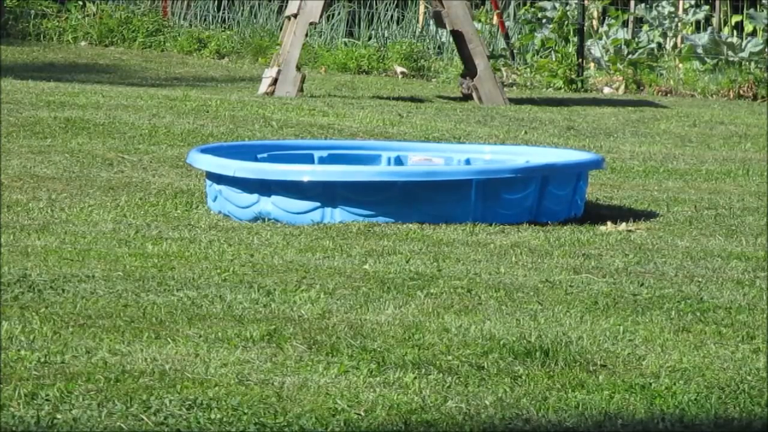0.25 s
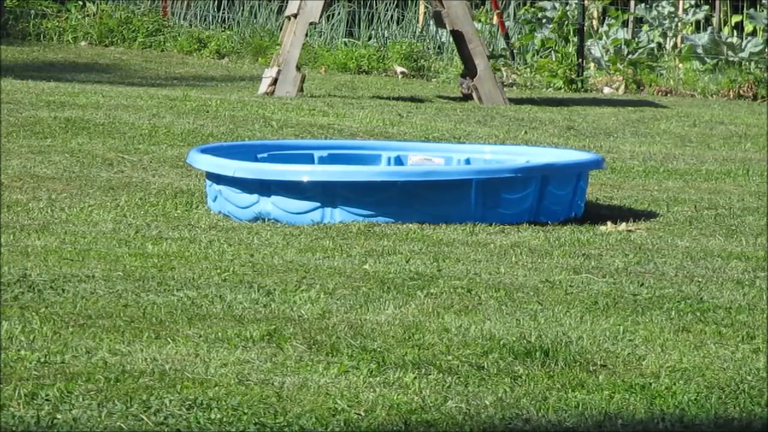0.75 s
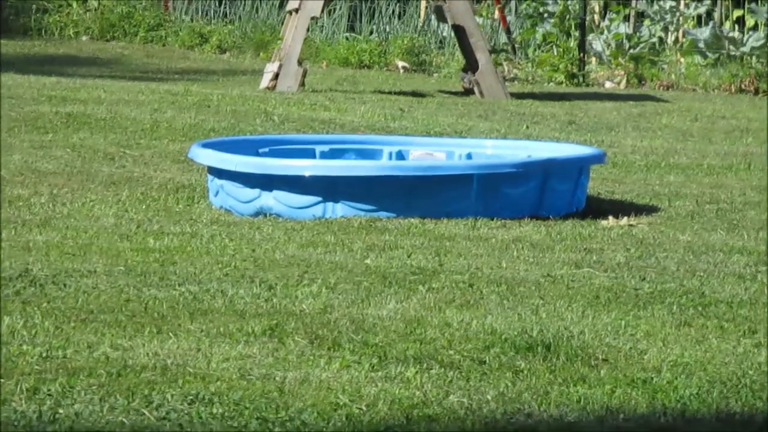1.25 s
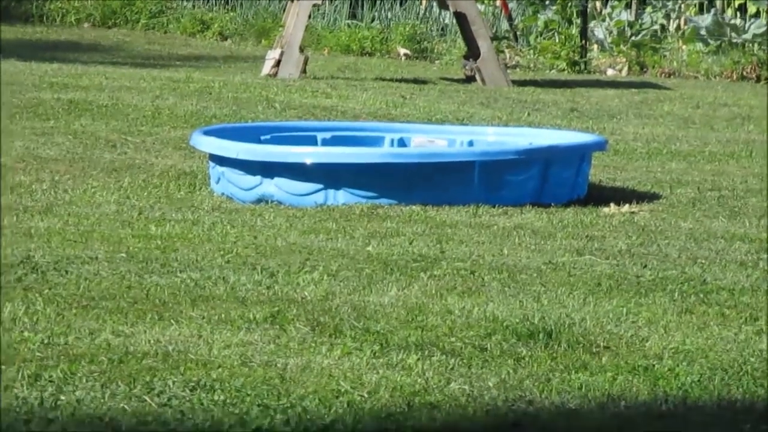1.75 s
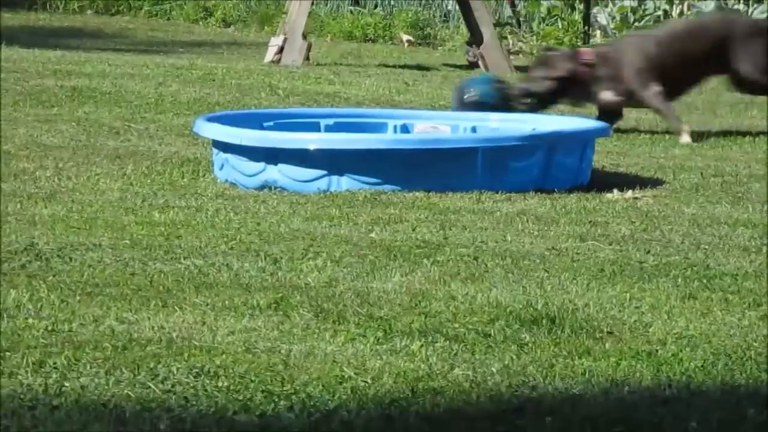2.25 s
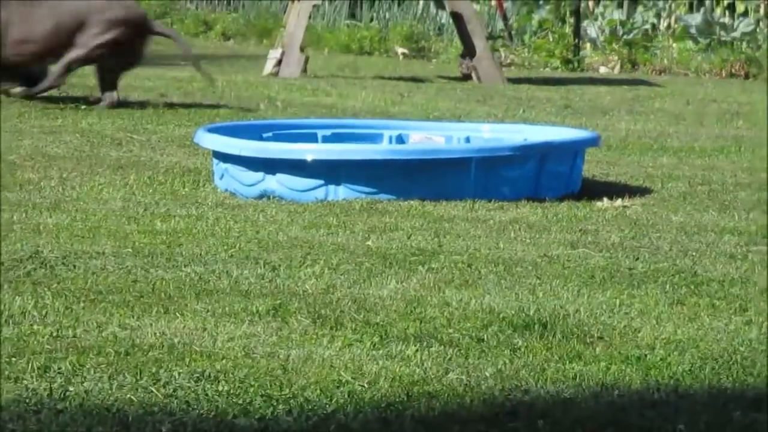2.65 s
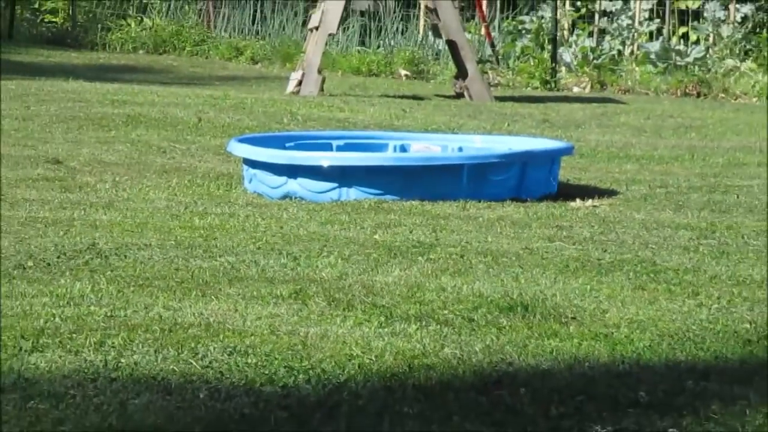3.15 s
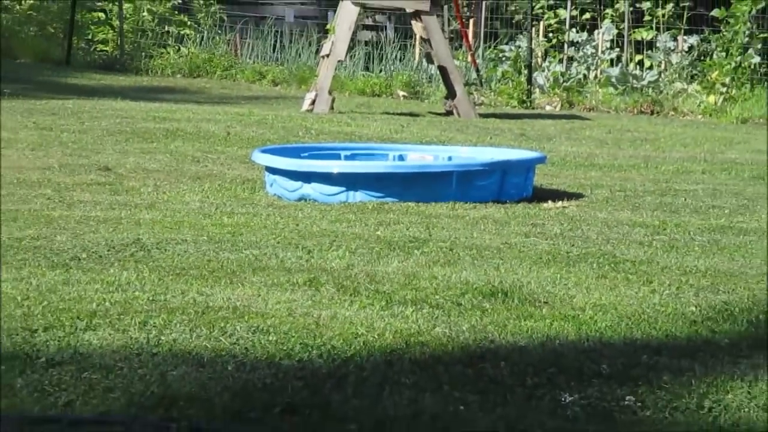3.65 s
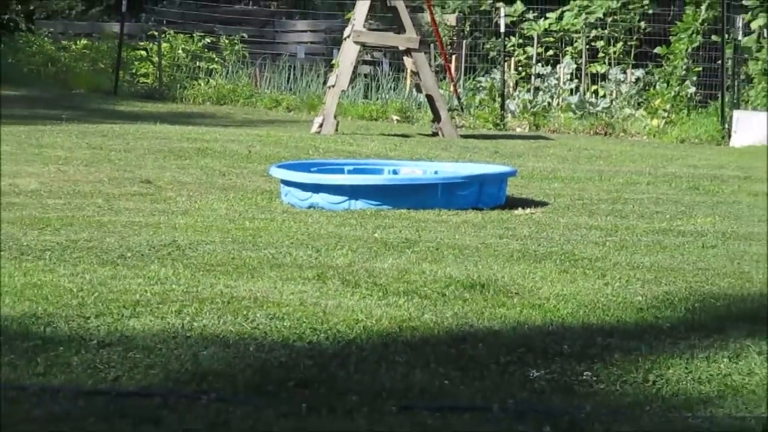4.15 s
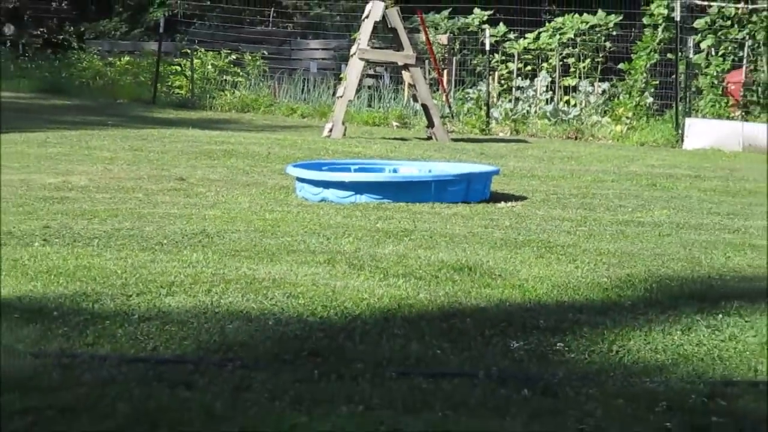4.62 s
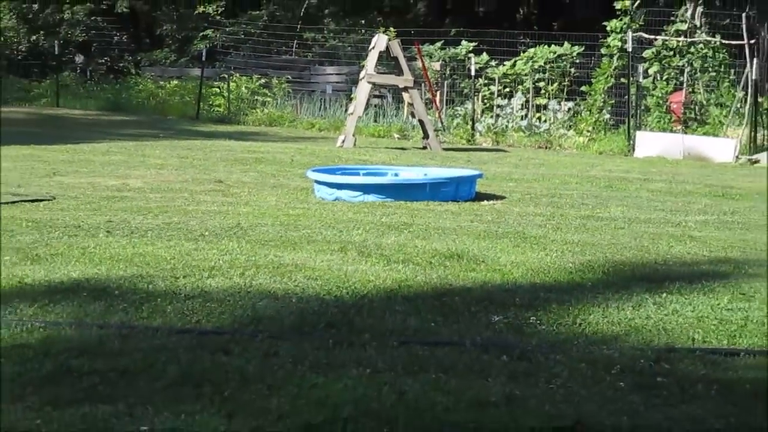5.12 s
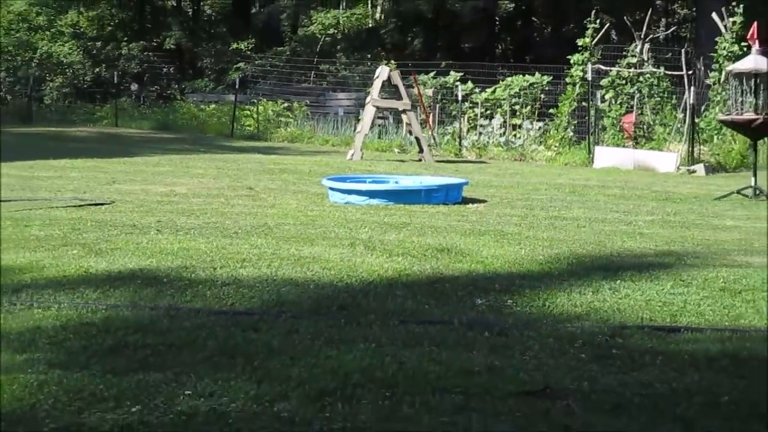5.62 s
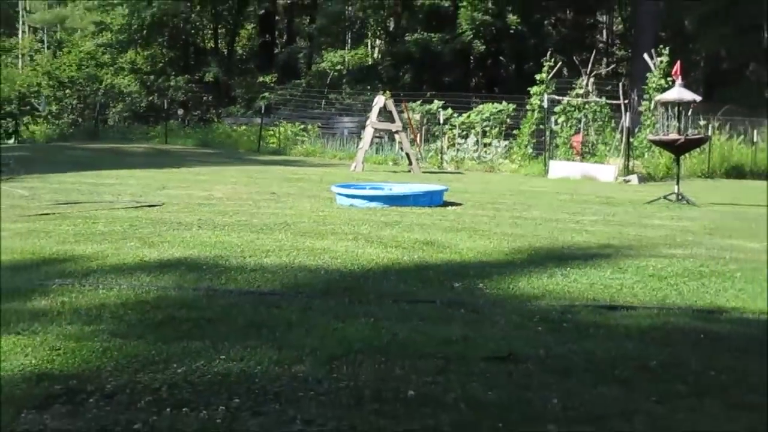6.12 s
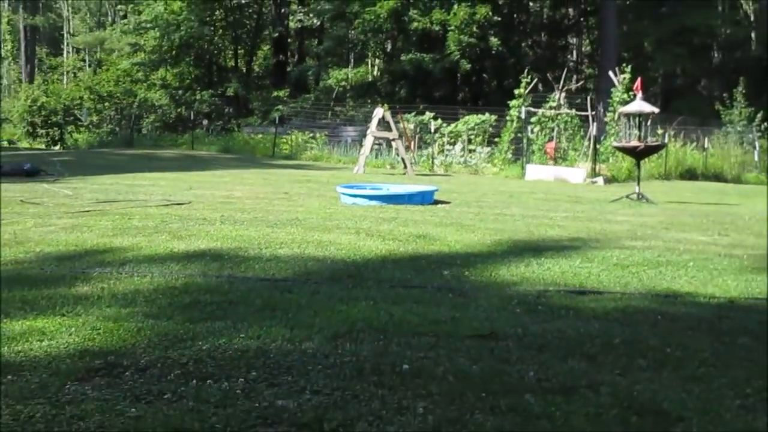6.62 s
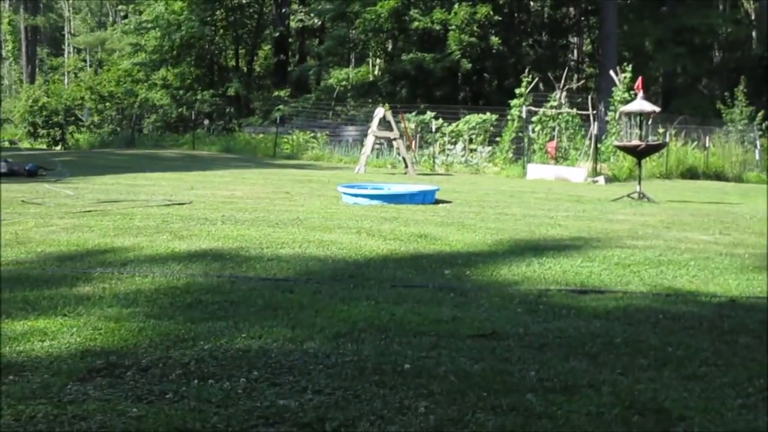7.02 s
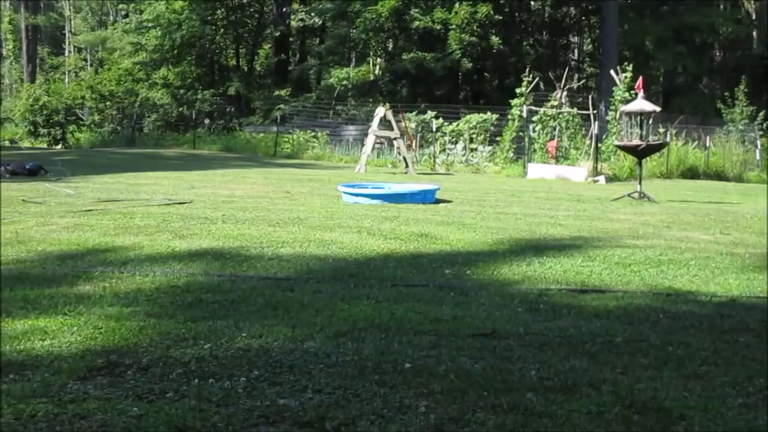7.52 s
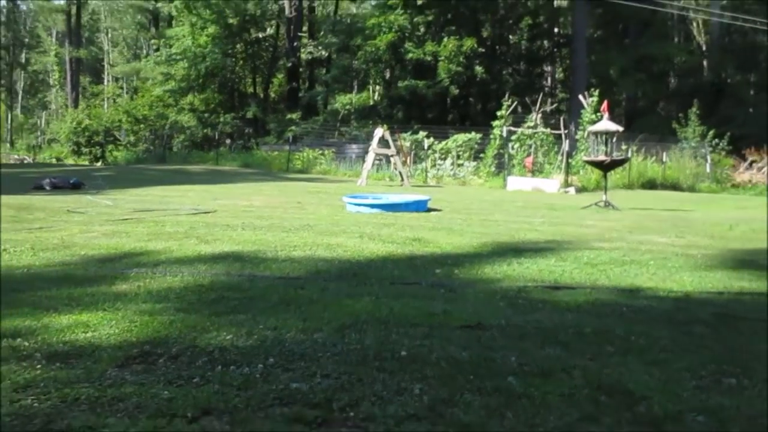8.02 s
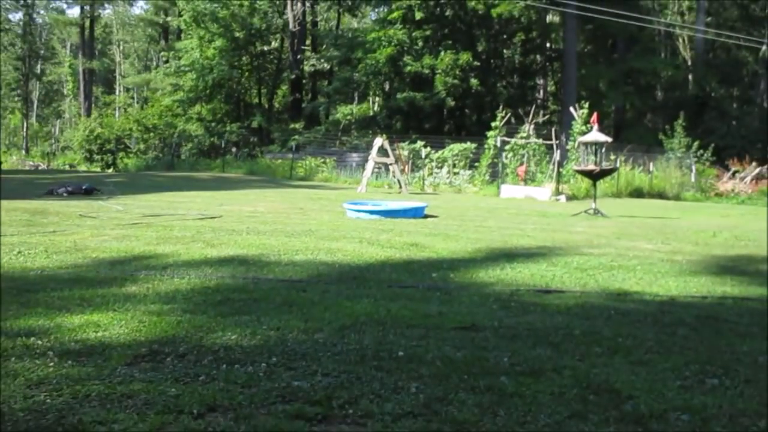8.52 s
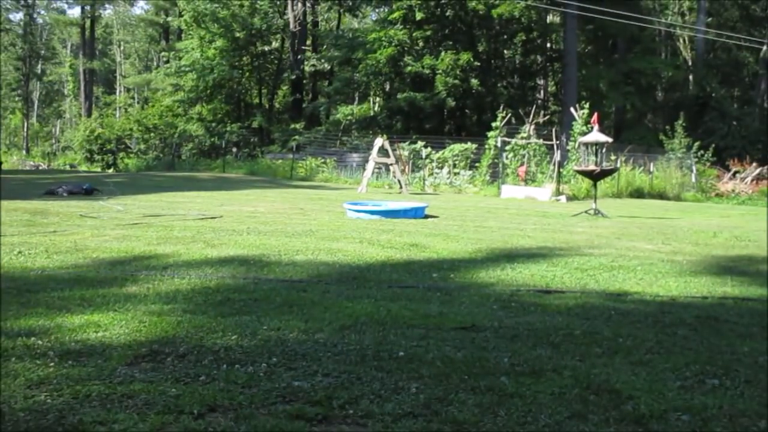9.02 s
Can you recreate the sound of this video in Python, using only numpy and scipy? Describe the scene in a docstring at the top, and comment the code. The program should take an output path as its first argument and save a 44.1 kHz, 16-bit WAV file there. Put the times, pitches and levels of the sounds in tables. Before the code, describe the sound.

A small zoom motor whirs with a fine gear rasp, heard very close through the camera's own microphone. Plastic rubbing and lever clicks come first, and a cluster of handling thumps and snaps interrupts early in the run. A sharp clack ends the long whir, and a second short burst follows about a second later. Faint outdoor air, low rumble and hiss lie underneath.

```python
"""A low rumble and faintly rustling air on a quiet lawn, heard through a hand-held camera's microphone.
Right at the microphone a finger rubs the body and pushes the zoom lever; the geared lens motor whirs,
zooming out for nearly five seconds, stops with a sharp clack, then runs again briefly.
The hand knocks on the housing now and then. A far drone and a faint hiss lie underneath,
and a faint call comes from far off near the end."""
import sys
import numpy as np
from scipy import signal
from scipy.fft import rfft, irfft, next_fast_len
from scipy.io import wavfile
from scipy.ndimage import uniform_filter1d, map_coordinates

SR = 44100
rng = np.random.default_rng(int(sys.argv[2]) if len(sys.argv) > 2 else 0)


def to_wav(sig):
    """Store sig (one row per channel, or 1-D mono) as 16-bit WAV at the path in sys.argv[1].

    Samples outside -1..1 are clipped; the rate is SR.
    """
    pcm = np.clip(np.atleast_2d(sig), -1, 1) * 32767
    pcm = np.round(pcm).astype(np.int16)
    wavfile.write(sys.argv[1], SR, pcm.T)  # frames by channels


N = 408624
T = np.arange(N) / SR
TURN_HZ = 41.668  # rotor speed

# the two runs of the lens motor: start_s, stop_s, coast_s, knock_db
MOTOR_RUNS = [(1.847, 6.506, .012, -0.5), (7.765, 8.178, 0.073, -1)]
# spectrum of rubbed plastic: pitch_hz, level_db
RUB_SPECTRUM = [(530, -19), (900, 0.5), (1240, -12.5), (1630, -3.5), (2150, -6), (2450, -14), (3030, -3.5),
                (3600, -7), (4300, -4), (5500, -13), (9510, -11), (13000, -18), (15500, -30)]


def from_db(db):
    """Decibels to gain."""
    return 10 ** (np.asarray(db) / 20)


def rms_one(x):
    """Scale to unit rms."""
    return x / np.sqrt(np.mean(x ** 2) + 1e-20)


def in_time(curve):
    """A curve of (time_s, value) points at every sample."""
    return np.interp(T, *np.transpose(curve))


def noise():
    """White noise."""
    return rng.standard_normal(N)


def rough(force):
    """Random signs turn a force envelope into a noise burst."""
    return force * rng.choice([-1, 1], N)


def drift(rate_hz):
    """Random wander of rms 1, turning rate_hz times a second."""
    knots = rng.standard_normal(N // 20)
    return rms_one(np.interp(T * rate_hz, np.arange(len(knots)), knots))


def colour(x, spectrum):
    """Causal (minimum-phase) filter through (pitch_hz, level_db) points; the result has rms 1."""
    size = next_fast_len(N + 8192) // 2 * 2
    hz, db = np.transpose(spectrum)
    log_hz = np.log(np.maximum(np.arange(size // 2 + 1) * SR / size, 1))
    cepstrum = irfft(np.log(from_db(np.interp(log_hz, np.log(hz), db))))
    cepstrum[size // 2:] = 0
    return rms_one(irfft(rfft(x, size) * np.exp(2 * rfft(cepstrum)))[:N])


def filtered(x, edge_hz, kind):
    """Gentle low-, high- or band-pass."""
    return signal.sosfilt(signal.butter(2, edge_hz, kind, fs=SR, output="sos"), x + 1e-18)


def resonate(x, modes):
    """Parallel resonances (pitch_hz, width_hz, level_db); white noise keeps about its power."""
    out, power = 0, 0
    for hz, width, db in modes:
        edges = np.clip([hz - width / 2, hz + width / 2], 10, SR / 2 - 10)
        out = out + from_db(db) * filtered(x, edges, "band")
        power += from_db(db) ** 2 * width / (SR / 2)
    return out / np.sqrt(power)


def ramp(past_s, edge_s):
    """Rises from 0 to 1 over edge_s as past_s crosses zero."""
    return np.clip(past_s / edge_s + .5, 0, 1)


def strokes(rows):
    """Envelope of strokes (start_s, stop_s, level_db, swell_db) that each glide in level."""
    out = np.zeros(N)
    for start, stop, db, swell_db in rows:
        span = np.arange(int(start * SR), min(int(stop * SR), N))
        out[span] += from_db(db + np.linspace(0, swell_db, len(span)))
    return uniform_filter1d(out, size=SR // 250)


def contacts(rows):
    """Envelope of contacts (peak_s, level_db, rise_s, decay_s) that build up and die away."""
    out = np.zeros(N)
    for s, db, rise, decay in rows:
        near = slice(int((s - .05) * SR), int((s + .1) * SR))
        t = T[near] - s
        out[near] += from_db(db) * np.exp(np.minimum(t / rise, -t / decay))
    return out


def ringing(hits, modes):
    """Every hit (start_s, level_db) sets the modes ringing as damped sines."""
    out, t = np.zeros(N), T[:SR // 5]
    ring = sum(from_db(db - 60 * t / t60) * np.sin(2 * np.pi * hz * t) for hz, db, t60 in modes)
    for s, db, *_ in hits:
        at = int(s * SR)
        out[at:at + len(t)] += from_db(db) * ring
    return out


def passing(turns, place, period=1):
    """A unit click, shared between two samples, as the rotor passes `place` every `period` turns."""
    samples_away = ((turns - place + period / 2) % period - period / 2) * SR / TURN_HZ
    return np.maximum(1 - np.abs(samples_away), 0)


def fading(clicks, decay_s):
    """Each click opens an envelope that dies away."""
    return signal.lfilter([1], [1, -np.exp(-1 / (decay_s * SR))], clicks + 1e-18)


def outdoor_air(rustle_end_s=1.78, air_follows=.51):
    """Rumble and wavering air; the air is a little louder and rustles until just before the motor starts."""
    # spectra of the rumble, the air and the rustle: pitch_hz, level_db
    rumble_spectrum = [(11, -54), (18, -16.5), (38, 0.5), (52, 0.5), (70, -1.5), (155, -1.5), (189, -5),
                       (249, -8.5), (278, -10.5), (330, -16), (430, -46.5), (730, -120)]
    air_spectrum = [(160, -22.5), (280, -7.5), (379, 2), (416, -2), (518, 0.5), (562, -2.5), (815, -0.5),
                    (1130, -7), (1490, -24), (1680, -17.5), (2140, -19), (4500, -39.5), (5850, -72),
                    (9900, -120)]
    rustle_spectrum = [(650, -34), (1100, 0), (2420, -12), (2660, -11.5), (4930, -15.5), (9440, -23.5),
                       (10300, -24), (14000, -37.5)]
    # slow swing of the rumble: time_s, level_db
    rumble_curve = [(0.0, -49), (7.3, -49), (7.59, -48.5), (8.05, -48), (8.9, -50), (9.27, -45)]
    early = ramp(rustle_end_s - T, edge_s=.072)
    rumble_db = in_time(rumble_curve)
    rumble = from_db(rumble_db + .5) * colour(noise(), rumble_spectrum)
    air_db = -57 + air_follows * (rumble_db - rumble_db.mean()) + 2.5 * early + 1.02 * drift(15)
    air = from_db(air_db) * colour(noise(), air_spectrum)
    rustle = early * from_db(-58.5 + drift(27.2)) * colour(noise(), rustle_spectrum)
    return rumble + air + rustle


def microphone_hiss():
    """The microphone's own faint, bright hiss."""
    # spectrum of the hiss: pitch_hz, level_db
    spectrum = [(2500, -26), (4500, -14), (5400, -6.5), (6500, 0), (7600, 1.5), (11600, -1.5),
                (15500, -10.5)]
    return from_db(-71.5 + drift(10)) * colour(noise(), spectrum)


def far_drone():
    """Two low tones from far away waver in pitch and level, each swelling once."""
    # the drone's tones: pitch_hz, waver_hz, level_db, swell_at_s, swell_width_s, swell_db
    tones = [(160.7, 5.01, -61, 4.67, 0.59, 9.5), (241, 2.43, -65, 3.835, 0.23, 16)]
    out = 0
    for hz, waver_hz, db, swell_at_s, width_s, swell_db in tones:
        level_db = db + swell_db * np.exp(-((T - swell_at_s) / width_s) ** 2) + drift(12)
        phase = 2 * np.pi * np.cumsum(hz + waver_hz * drift(14)) / SR
        out = out + from_db(level_db) * np.sqrt(2) * np.sin(phase)
    return out


def clack(hits, barrel_db):
    """Rough plastic contacts shake the lens barrel, the latch, the shell and the drive."""
    # resonances of these four parts: pitch_hz, width_hz, level_db
    barrel = [(1550, 250, 2), (2440, 560, 5.5), (2990, 280, 3.5), (4250, 600, -1)]
    latch = [(6560, 690, -1.5), (8970, 800, -6), (10000, 3400, -0.5), (11800, 4000, -9)]
    shell = [(340, 166, -2.5), (792, 276, 3), (952, 170, -2)]
    drive = [(4200, 810, 0)]
    peak_s, level_db, rise_s, decay_s, latch_db, shell_db, drive_db = np.transpose(hits)
    out = 0
    for modes, part_db in (barrel, barrel_db), (latch, latch_db), (shell, shell_db), (drive, drive_db):
        force = contacts(zip(peak_s, level_db + part_db, rise_s, decay_s))
        out = out + resonate(rough(force), modes)
    return out


def lever_and_lens_stops(click_rise_s=.00032, stop_rise_share=.96):
    """The zoom lever clicks at once, the lens builds up as it grinds into a stop; the barrel rings on."""
    # lever clicks, and at 2.102 s the soft contact of a finger tap on the body: peak_s, level_db, decay_s,
    # latch_db, shell_db, drive_db, lever_db
    clicks = [(0.33, -42, 0.01, -24, -1, -19, -25), (1.586, -47, .0015, -6, -10, -2, -3),
              (1.6591, -35.5, 0.0013, -23, 0, -18, -16), (1.6835, -29.5, 0.0019, -21, -5, -15, -12),
              (1.6917, -24.5, 0.0011, -16, -3, -8, -20), (1.7023, -27, 0.007, -20, -9.5, -16, -18),
              (2.102, -43, .003, -25, 5, -23, -15), (2.908, -39.5, 0.0018, -25, 6.5, -25, -20),
              (6.675, -52.5, 0.0016, 5.5, 0, -15, -9), (6.685, -52, 0.0022, -12, 9.5, -23, -10),
              (6.7351, -34, 0.00085, -8.5, 4.5, -22, -10), (6.9112, -52, 0.0021, -5, 4, -18, 6.5),
              (6.92, -54.5, 0.0023, -5, -5, -18, 4), (8.5507, -46, 0.0056, -10.5, 0, -29, -9)]
    # lens stops: peak_s, level_db, contact_s, latch_db, shell_db, drive_db
    stops = [(1.7452, -23, 0.00088, -19, -2, 3.5), (6.455, -24.5, 0.0015, 4, 0, -14),
             (7.633, -53.5, 0.0041, -1, 0, -12), (7.663, -39.5, 0.0044, -1.5, -4, -11),
             (7.694, -33, 0.0025, -4.5, -13, -7), (8.1257, -36.5, 0.0064, 2, 2.5, -13)]
    # the lever's resonances: pitch_hz, width_hz, level_db
    lever_modes = [(1830, 330, -2), (2430, 350, 3), (6840, 900, -8)]
    # the barrel's lingering modes: pitch_hz, level_db, t60_s
    barrel_modes = [(1545, -20.5, 0.079), (2290, -28.5, .074), (2396, -17.5, 0.089), (2584, -23, 0.16),
                    (2930, -33, 0.21), (3375, -38, 0.18)]
    click_hits = [(s, db, click_rise_s, *rest) for s, db, *rest, _ in clicks]
    stop_hits = [(s, db, stop_rise_share * length, length, *parts) for s, db, length, *parts in stops]
    force = contacts([(s, db + lever_db, click_rise_s, decay) for s, db, decay, *_, lever_db in clicks])
    lever = resonate(rough(force), lever_modes)
    ring = ringing(stops, barrel_modes) + from_db(-10) * ringing(clicks, barrel_modes)
    return clack(stop_hits, barrel_db=-2) + clack(click_hits, barrel_db=-9.5) + lever + ring


def surge(decay_s=.053):
    """Strain on the drive: 1 at each motor start, then dying away."""
    return sum((T >= start) * np.exp(-np.maximum(T - start, 0) / decay_s) for start, *_ in MOTOR_RUNS)


def drive_strain():
    """Friction in the drive: it squeals as it takes up slack, then squeals and scuffs at each start."""
    # squeals in the slack: start_s, stop_s, level_db, swell_db
    squeals = [(1.088, 1.16, -50.5, 1), (1.757, 1.818, -44.5, 0), (1.818, 1.846, -51, -1),
               (7.712, 7.765, -54, 10)]
    # resonances of the slack and spin-up squeals: pitch_hz, width_hz, level_db
    slack_modes = [(4290, 290, 0.5), (4510, 280, -3), (5150, 700, -11)]
    spin_up_modes = [(4410, 420, 1), (4800, 340, -0.5), (5280, 370, -5)]
    slipping = noise() * from_db(drift(270))
    slack = strokes(squeals) * resonate(slipping, slack_modes)
    spin_up = from_db(-40.5) * resonate(slipping, spin_up_modes)
    scuff = from_db(-47) * colour(noise(), RUB_SPECTRUM)
    return slack + surge() * (spin_up + scuff)


def loose_gears(coast_db=-59, fade_db=10):
    """The gears hiss as they stir under the first touch and as they coast down after each run."""
    # the brief stir: start_s, stop_s, level_db, swell_db
    stirs = [(1.088, 1.185, -55, 0.5)]
    # spectra of stirring and coasting gears: pitch_hz, level_db
    stir_spectrum = [(3000, -18), (6300, -14), (7300, -5), (8300, -9), (10000, 1), (11300, 0), (13000, -12),
                     (15500, -16)]
    coast_spectrum = [(1500, -25), (4500, -18), (7000, -5), (10500, 0), (13000, -10), (15500, -20)]
    coasts = [(stop, stop + coast_s, coast_db, -fade_db) for _, stop, coast_s, _ in MOTOR_RUNS]
    stirring = strokes(stirs) * colour(noise(), stir_spectrum)
    return stirring + strokes(coasts) * colour(noise(), coast_spectrum)


def finger_rub(grain_db=2, ease_db=4.5):
    """Skin slides, catches and drags on textured plastic; the cover rings, the lever scrapes its slot."""
    # slides that ease off: start_s, stop_s, level_db
    slides = [(1.094, 1.19, -51), (1.205, 1.401, -48), (1.468, 1.581, -51)]
    # bright catches, drags on the cover, pushes on the lever: start_s, stop_s, level_db, swell_db
    catches = [(1.208, 1.232, -46, -7), (1.232, 1.27, -54, 1), (1.27, 1.293, -53, -5)]
    drags = [(1.255, 1.39, -54, 0)]
    pushes = [(1.695, 1.728, -48, 10), (1.728, 1.747, -32.5, 2), (1.749, 1.777, -45, 11),
              (1.777, 1.817, -50.5, 4), (1.817, 1.848, -55, -1)]
    # spectra of catching skin and scraping lever: pitch_hz, level_db
    catch_spectrum = [(2500, -14), (4600, 1), (6500, 1), (8000, -3), (10000, 1), (12500, -2), (13500, -13)]
    scrape_spectrum = [(300, -4.5), (800, -9), (1600, -3.5), (2200, -5), (3000, -2), (4100, 0.5),
                       (5400, -15), (7200, -7), (10000, -9.5), (12500, -15), (15500, -25)]
    # the cover's resonances: pitch_hz, width_hz, level_db
    cover_modes = [(895, 150, -1), (1655, 110, 2.5), (2590, 300, 1.5), (2930, 240, 0), (4170, 570, -3),
                   (4670, 150, -4), (5520, 130, -4)]
    slips = rms_one(noise() * from_db(grain_db * drift(700)))
    pressure = strokes([(*slide, -ease_db) for slide in slides])
    cover = from_db(-2) * resonate(noise(), cover_modes)
    sliding = pressure * rms_one(colour(slips, RUB_SPECTRUM) + cover)
    catching = strokes(catches) * colour(slips, catch_spectrum)
    dragging = strokes(drags) * resonate(noise(), cover_modes)
    scraping = strokes(pushes) * colour(slips, scrape_spectrum)
    return sliding + catching + dragging + scraping


def friction(turns, repeat, grit_db):
    """Surface roughness that comes round every turn (power share `repeat`), mixed with fresh noise."""
    grains, sizes = rng.standard_normal((2, int(SR / TURN_HZ)))
    surface = rms_one(grains * from_db(grit_db * np.clip(sizes, -2, 2)))
    recurring = map_coordinates(surface, [turns % 1 * len(surface)], order=3, mode="grid-wrap")
    return np.sqrt(repeat) * recurring + np.sqrt(1 - repeat) * noise()


def lens_motor():
    """A governed three-pole rotor drives the lens through a gear train, right beside the microphone."""
    # the rotor falls behind under load and while it rests: time_s, lag_turns
    lag = [(2.1, -.03), (2.25, .02), (2.85, .03), (2.98, .12), (3.05, .07), (6.52, .06), (7.7, 6.43)]
    turns = TURN_HZ * T - in_time(lag) + .0062 * drift(14) + .001 * drift(120)
    travel = np.interp(T, MOTOR_RUNS[0][:2], [0, 1])  # 0 at full zoom, 1 after the first run
    kicks = pole_kicks(turns, travel)
    rotor = pole_knocks(kicks, travel) + housing_whine(turns, travel) + brush_chirps(turns, travel)
    gearing = gear_hiss(turns, travel, kicks) + lens_tube(turns, travel) + gear_teeth(turns, travel)
    running = sum(ramp(np.minimum(T - start, stop - T), edge_s=.015) for start, stop, *_ in MOTOR_RUNS)
    return (rotor + gearing) * running


def pole_kicks(turns, travel, rebound=.077, rebound_turns=.044):
    """The poles kick unequally, more so as the lens travels; the shaft rebounds in its bearing."""
    # the three rotor poles: place_turns, level_db, ease_db
    poles = [(-.015, 0, 0), (.31, -3.5, 6), (.645, -7.5, 2)]
    out = 0
    for place, db, ease_db in poles:
        kick = passing(turns, place) - rebound * passing(turns, place + rebound_turns)
        out = out + from_db(db - ease_db * travel) * kick
    return out


def pole_knocks(kicks, travel, ease_db=6, surge_db=7.5):
    """The kicks sound as knocks, harder at each start and easing as the lens travels."""
    # spectrum of a knock: pitch_hz, level_db
    spectrum = [(1000, -43), (1500, -34), (1620, 2), (1850, 1), (2250, 5), (2650, -3), (3080, 3),
                (3600, -11.5), (3950, -10.5), (4600, -21), (7000, -14)]
    run_db = sum(db * (T > start) * (T < stop) for start, stop, _, db in MOTOR_RUNS)
    return from_db(-58 - ease_db * travel + surge_db * surge() + run_db) * colour(kicks, spectrum)


def housing_whine(turns, travel, overtone=102, ease_db=4, surge_db=3):
    """The brushes rub and drop into three gaps a turn, ringing the housing; one overtone sings out."""
    # spectrum of the housing's ring: pitch_hz, level_db
    spectrum = [(3000, -47), (3850, -23), (4080, -14), (4200, -4.5), (4280, -1), (4380, -3.5), (4520, -6),
                (4700, -10), (5000, -32.5)]
    drops = sum(passing(turns, place) for place in np.arange(3) / 3 + .08)
    ring = colour(rms_one(drops) + .97 * friction(turns, repeat=.98, grit_db=2), spectrum)
    whine = from_db(2 + .3 * drift(25)) * np.sin(2 * np.pi * overtone * turns + .5 * drift(60))
    return from_db(-60.5 - ease_db * travel + surge_db * np.sqrt(surge())) * (ring + whine)


def brush_chirps(turns, travel, blur_rad=.8, ease_db=17, surge_db=10):
    """Under load the brushes squeal in short falling chirps each turn, loudest just after a start."""
    # chirps of one turn: place_turns, pitch_hz, fall_hz_per_s, half_length_s, level_db
    chirps = [(.24, 4660, 45000, .0024, -3), (.56, 4370, 30000, .004, 0), (.75, 5280, 30000, .003, -8),
              (.9, 4350, 50000, .0028, -5), (.8, 6800, 90000, .005, -11)]
    out = 0
    for place, hz, fall_hz_per_s, half_length_s, db in chirps:
        t = ((turns - place + .5) % 1 - .5) / TURN_HZ
        phase = 2 * np.pi * (hz - fall_hz_per_s * t / 2) * t + blur_rad * drift(150)
        out = out + from_db(db) * np.exp(-(t / half_length_s) ** 2) * np.sin(phase)
    return out * from_db(-52.5 - ease_db * np.sqrt(travel) + surge_db * np.sqrt(surge()))


def gear_hiss(turns, travel, kicks, pinion_teeth=12, mesh_db=3):
    """The pinion's teeth rub in turn, harder under each kick as the lens travels."""
    # spectrum of the rubbing gears: pitch_hz, level_db
    spectrum = [(1400, -37.5), (2000, -8.5), (3100, -10), (3700, -9), (4300, -4), (4900, -3.5), (5300, 2.5),
                (5800, -0.5), (6200, 2.5), (6750, -3), (7400, -3), (8800, 2), (10100, 5.5), (11100, -6),
                (11700, 1), (12650, -7), (13100, -9), (15500, -20)]
    mesh = np.cos(2 * np.pi * pinion_teeth * turns)
    pressure = from_db(mesh_db * mesh) + 2.7 * travel * fading(kicks, decay_s=.00036)
    rubbing = friction(turns, repeat=.82, grit_db=1) * pressure
    return from_db(-54.5) * colour(rubbing, spectrum)


def lens_tube(turns, travel, swap_travel=.46, swap_width=.2):
    """Friction sounds the lens tube, whose resonances trade strength as the lens travels."""
    # the tube's resonances: pitch_hz, width_hz, first_db, last_db
    modes = [(3980, 250, -68.5, -90), (5190, 150, -70.5, -77), (5780, 510, -64.5, -74),
             (6080, 470, -75, -70.5), (6980, 230, -63, -71), (8560, 930, -81, -60)]
    swap = .5 + .5 * np.tanh((travel - swap_travel) / swap_width)
    out = 0
    for hz, width, first_db, last_db in modes:
        band = resonate(friction(turns, repeat=.52, grit_db=0), [(hz, width, 0)])
        out = out + from_db(first_db + (last_db - first_db) * swap) * rms_one(band)
    return out


def gear_teeth(turns, travel, bite_s=2.035, wheel_turns=11, grain_db=7.5, ease_db=8.5):
    """Once the slack is gone the gears rasp; high pinion teeth tick and nicks on the next wheel click."""
    # high teeth of the pinion: place_turns, level_db
    high_teeth = [(.455, -42), (.59, -48)]
    # nicks on the next wheel: place_turns (of the rotor), level_db, pitch_hz, width_hz, treble_db
    nicks = [(5.455, -32.5, 8200, 1800, 2), (8.455, -37, 8300, 1500, -3), (9.455, -43, 6300, 600, -14),
             (10.59, -43, 8300, 1800, 7)]
    # resonances of the tick and the rasp: pitch_hz, width_hz, level_db
    tooth_modes = [(8140, 2000, 1.1), (9220, 570, 0.84), (11700, 1100, 2)]
    rasp_modes = [(12000, 1600, 0)]

    def tick(strikes, modes):
        return resonate(rough(fading(strikes, decay_s=.00055)), modes)
    ticks = tick(sum(from_db(db) * passing(turns, place) for place, db in high_teeth), tooth_modes)
    for place, db, hz, width, treble_db in nicks:
        nick_modes = [(hz, width, 0), (11750, 1200, treble_db)]
        ticks += from_db(db) * tick(passing(turns, place, wheel_turns), nick_modes)
    grit = friction(turns, repeat=.45, grit_db=3) * from_db(grain_db * drift(500))
    rasp = from_db(-60 - ease_db * travel) * rms_one(resonate(grit, rasp_modes))
    return ramp(T - bite_s, edge_s=.17) * (ticks + rasp)


def hand_bumps(soft_hz=1200, swing_cycles=4.4, scuff_delay_s=.0059, rise_s=.0033, decay_s=.0072):
    """Soft skin gives the body a damped swing: light under a finger, deep under the scuffing hand."""
    # finger taps: start_s, level_db
    taps = [(2.103, -32), (2.2377, -19.5), (2.461, -33), (2.908, -27), (3.0575, -20.5), (3.089, -20.5),
            (3.1362, -18.5), (4.259, -32), (4.9135, -23), (4.9303, -26), (5.024, -26), (5.051, -31),
            (5.131, -25), (5.571, -28.5)]
    # the body's answer to a tap: pitch_hz, level_db, t60_s
    body_modes = [(432, -1.5, 0.011), (750, -16, 0.0033)]
    # thumps and nudges of the hand: start_s, level_db, swing_hz
    thumps = [(2.9864, -15.5, 98), (7.6579, -33.5, 250), (7.689, -31, 245)]
    # spectrum of the skin's scuff as it lands: pitch_hz, level_db
    scuff_spectrum = [(40, -10.5), (170, 1.5), (250, 2.5), (380, -11.5), (650, -8), (1150, -13.5),
                      (1500, -30), (2600, -34), (5000, -36)]
    tapping = filtered(ringing(taps, body_modes), 230, "high")
    swings = sum(ringing([(s, db)], [(hz, 0, swing_cycles / hz)]) for s, db, hz in thumps)
    scuffs = contacts([(s + scuff_delay_s, db - 6, rise_s, decay_s) for s, db, _ in thumps])
    return filtered(tapping + swings, soft_hz, "low") + scuffs * colour(noise(), scuff_spectrum)


def seam_snaps(rise_s=.0001, decay_s=.00064):
    """A seam of the housing snaps under the grip."""
    # the snaps: peak_s, level_db
    snaps = [(3.0576, -25.5), (3.0893, -19.5), (3.1363, -19), (7.556, -43)]
    # the seam's resonances: pitch_hz, width_hz, level_db
    modes = [(740, 710, 0), (2210, 600, -4.5), (4540, 960, -6), (6260, 1100, -2), (9090, 2000, 4.5),
             (12400, 2800, -9)]
    force = contacts([(s, db, rise_s, decay_s) for s, db in snaps])
    return resonate(rough(force), modes)


def far_call():
    """One faint, short call from far off: two bands of noise."""
    # the call: start_s, stop_s, level_db, swell_db
    call = [(8.96, 9.11, -71.5, 2)]
    # its bands: pitch_hz, width_hz, level_db
    bands = [(2660, 500, 3), (4200, 400, -6)]
    return strokes(call) * resonate(noise(), bands)


def scene():
    """The camera's own noises reach the microphone through its body, with no room; the lawn lies behind."""
    zoom = lens_motor() + drive_strain() + loose_gears() + lever_and_lens_stops()
    handling = finger_rub() + hand_bumps() + seam_snaps()
    lawn = outdoor_air() + far_drone() + far_call()
    return (zoom + handling + lawn + microphone_hiss())[None]


def record(dry):
    """The built-in mono microphone, with the top cut steeply."""
    cutoff_hz = 15850
    return signal.sosfilt(signal.ellip(10, .1, 80, cutoff_hz, fs=SR, output="sos"), dry)


dry = scene()
out = record(dry)
to_wav(out)
```